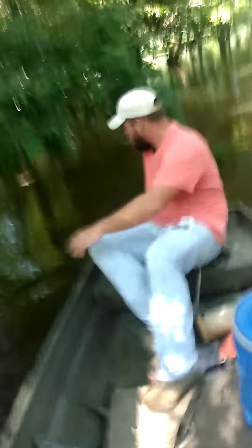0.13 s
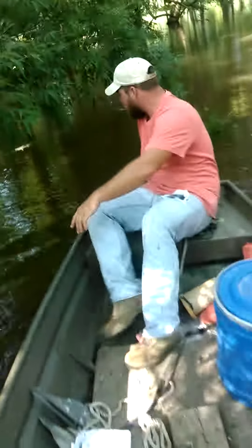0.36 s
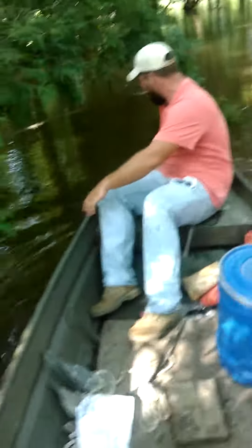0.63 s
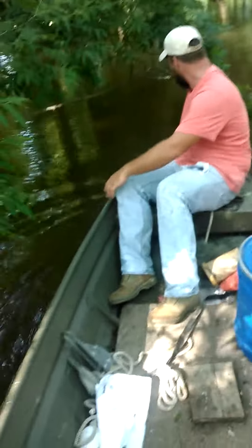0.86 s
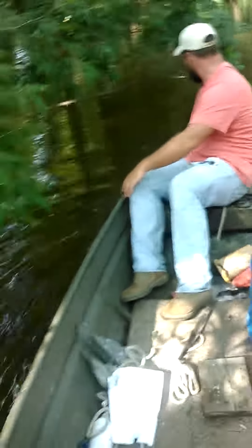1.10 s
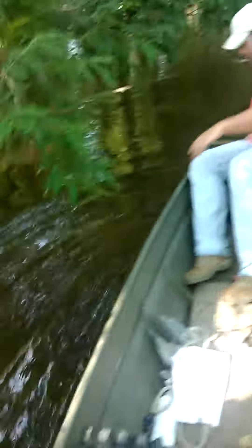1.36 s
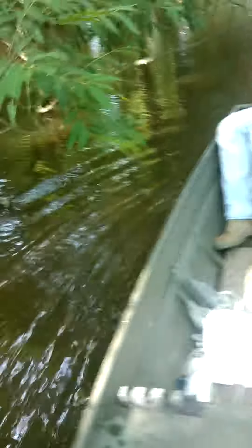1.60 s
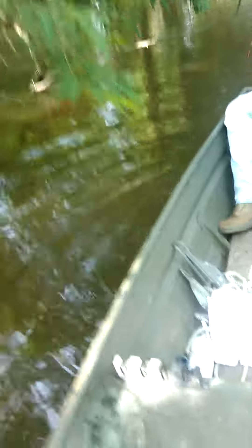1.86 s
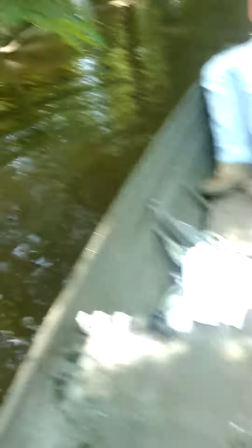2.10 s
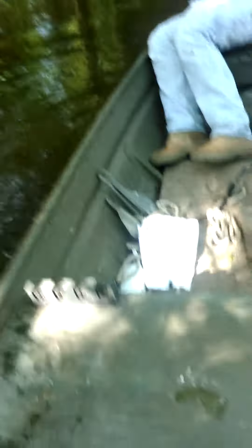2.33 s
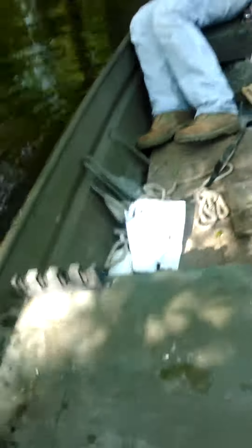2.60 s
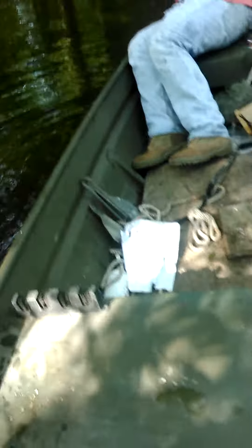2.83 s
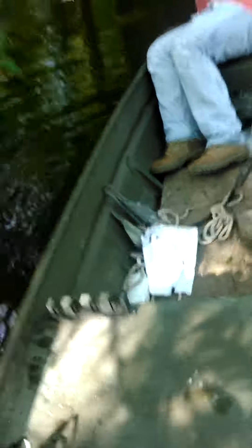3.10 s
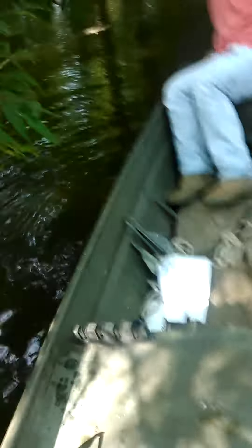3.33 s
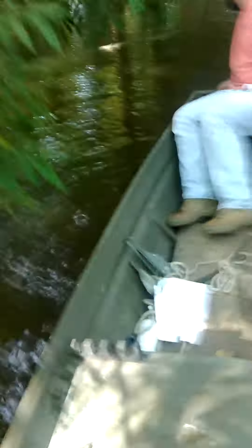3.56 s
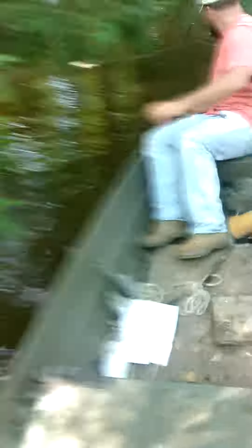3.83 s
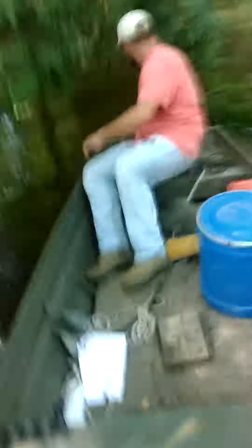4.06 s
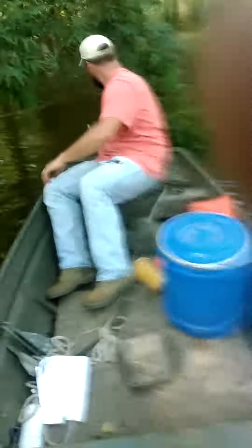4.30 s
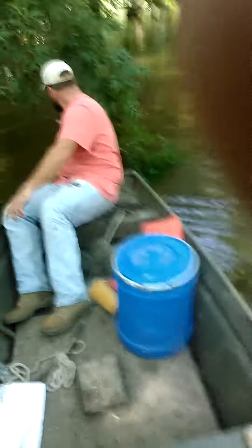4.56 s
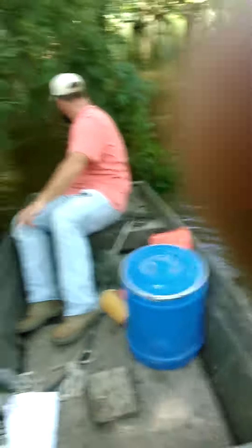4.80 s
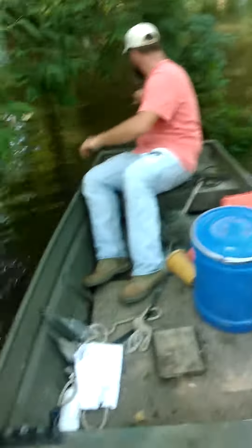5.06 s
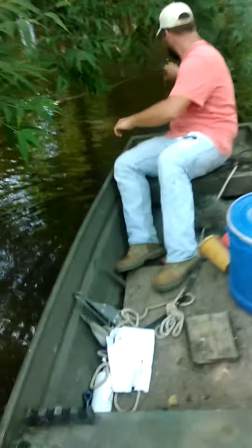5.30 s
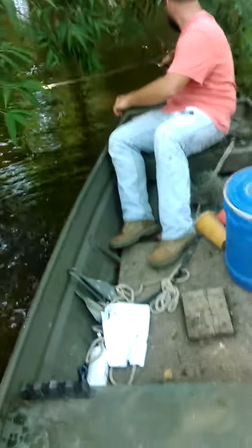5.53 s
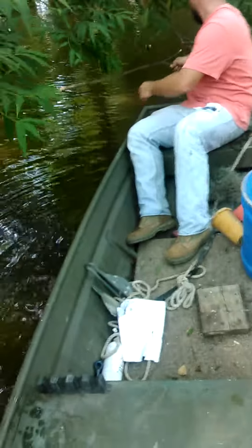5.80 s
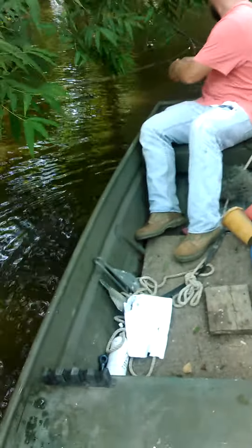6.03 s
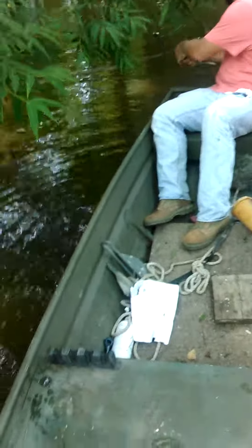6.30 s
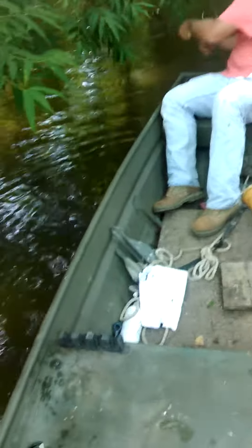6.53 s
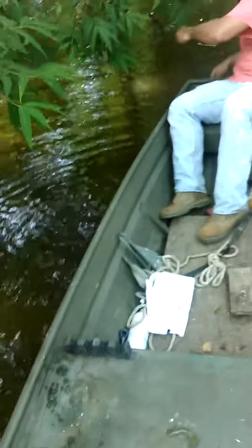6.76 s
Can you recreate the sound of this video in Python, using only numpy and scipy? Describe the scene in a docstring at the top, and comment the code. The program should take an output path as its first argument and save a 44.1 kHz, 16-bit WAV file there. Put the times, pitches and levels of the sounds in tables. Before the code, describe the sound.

Feet and gear shift in a flat metal boat on a wooded river: boomy thud, dragged metal, hard clatter, then quiet insects and birds.

```python
"""Gear and feet shift in a flat metal boat on a wooded river: thuds boom in the hull as damped low tones,
and noise that follows the shifting weight rings the hull's modes. Things tap and drop as short pitched rattles;
dragged metal is gritty noise through resonances, with squeaks; cloth rustles as grainy noise.
An insect chorus hisses from the banks in one high noise band, far birds whistle as gliding tones among
echoing trees, and a faint wash of filtered noise stands for leaves, water and distance."""
import sys
import numpy as np
from scipy import signal
from scipy.fft import rfft, irfft, next_fast_len
from scipy.io import wavfile
from scipy.ndimage import map_coordinates

SR = 44100
rng = np.random.default_rng(int(sys.argv[2]) if len(sys.argv) > 2 else 0)


def volts_from_db(level):
    """Convert decibel levels to linear amplitude ratios."""
    exponent = np.asarray(level, float) / 20
    return 10 ** exponent


def pcm_store(signal):
    """Save signal as 16-bit PCM."""
    levels = np.round(np.clip(np.atleast_2d(signal), -1, 1) * 32767)
    wavfile.write(sys.argv[1], SR, levels.astype(np.int16).T)


N = 304288  # samples


# low modes of the hull [f/Hz, width/Hz, level/dB]
HULL_MODES = [(65.8, 23, 4), (97, 23, 6.5), (138.2, 18.1, 4.5), (194, 40, -1), (248, 59.4, -5),
              (331.3, 29, -9), (465, 110, -22)]
# modes of the ribs, which the taps excite too [f/Hz, width/Hz, level/dB]
RIB_MODES = [(402, 98, 2), (488, 63, 3.5), (531, 91, -0.5), (641.5, 42, 3.5), (702, 170, -5),
             (940, 96, 0.5), (1044, 1050, -7)]
# the boat rocking between shifts [t/s, drone level/dB]
ROCKING = [(0, -47.5), (.9, -52.5), (1.3, -53), (1.6, -46), (2.0, -49), (2.3, -40), (2.65, -36),
           (3.3, -45.5), (3.8, -50.5), (4.5, -57), (4.8, -50.5), (5.2, -56), (6.0, -56), (6.9, -54)]
# soft blows on the hull [t/s, level/dB, f/Hz, t60/s]
THUDS = [(0.105, -2.5, 120, 0.11), (0.139, -23, 126, 0.085), (0.184, -9.5, 122.9, 0.21),
         (0.274, -13, 110, 0.095), (0.353, -22, 121, 0.084), (0.43, -28.5, 118, 0.41),
         (0.579, -36, 96.5, 0.18), (0.79, -27.5, 70.6, 0.3), (0.861, -18.5, 53, 0.17),
         (0.92, -20, 57, 0.11), (1.302, -35, 81, 0.31), (1.85, -28, 63, 0.13), (2.04, -31, 149, 0.54),
         (2.713, -6.5, 192, 0.074), (2.755, -7, 194, 0.16), (2.918, -7.5, 337, 0.098),
         (3.545, -34, 150, 0.13), (4.085, -16.5, 61, 0.14), (4.222, -24, 92.2, 0.095),
         (4.262, -23.5, 74.5, 0.15), (4.395, -20, 80, 0.13), (4.535, -36, 131, 0.15),
         (6.786, -37, 246, 0.11)]


def hull():
    """Modal resonance: shifting weight drones the plates and clatters the ribs; soft blows add damped low swings."""
    rocking_db = curves(ROCKING)[0] + 2 * wobble(11)  # a slight random sway
    clatter_beside_drone_db = -12
    rocking_clatter_db = rocking_db + clatter_beside_drone_db
    # powers of shifting and rocking add
    drone_db = 10 * np.log10(shifts(column=2) + volts_from_db(2 * rocking_db))
    clatter_db = 10 * np.log10(shifts(column=3) + volts_from_db(2 * rocking_clatter_db))

    def soft(hz):
        """Contact compliance: padded contacts give little treble."""
        return 1 / (1 + 1j * hz / 1500) ** 2

    def plates(hz):
        """Modal response of the hull, weakened in the deepest bass."""
        bass_cut = (1j * hz / (1j * hz + 70)) ** 2
        return resonances(HULL_MODES)(hz) * soft(hz) * bass_cut

    drone = rung(drone_db, grains(27, lumpy_db=0.9), plates)
    clatter = rung(clatter_db, grains(80, lumpy_db=2), lambda hz: resonances(RIB_MODES)(hz) * soft(hz))
    out = np.pad(drone + clatter, (0, SR))
    t = np.arange(SR // 2) / SR
    onset = 1 - np.exp(-t / 0.0066)
    for s, db, hz, t60 in THUDS:
        decay = volts_from_db(db + 1 - 60 * t / t60)
        out[round(s * SR):][:len(t)] += decay * np.sin(2 * np.pi * hz * t) * onset
    return out[:N]


# weight shifting on the floor plates [t/s, hold/s, drone level/dB, clatter level/dB, fade t60/s]
SHIFTS = [(0.0, 0.006, -33.5, -48.5, 0.06), (0.106, 0.041, -16.5, -41.5, 0.35),
          (0.259, 0.056, -29, -44, 0.18), (0.343, 0.012, -26.5, -44, 0.22),
          (0.416, 0.014, -28.5, -55, 0.17), (0.485, 0.054, -41, -47.5, .15),
          (0.581, 0.011, -32.5, -63, 0.37), (0.79, 0.028, -38, -58, 0.26),
          (1.047, 0.013, -39.5, -47.5, 0.52), (1.29, 0.038, -43.5, -51, .25),
          (1.664, 0.016, -47, -55.5, 0.69), (1.783, 0.017, -55, -49, 0.08), (2.039, 0.055, -37, -46, 0.19),
          (2.137, 0.049, -35.5, -37, 0.52), (2.438, .07, -40, -42.5, 0.39),
          (2.572, 0.061, -54, -37.5, 0.29), (2.699, 0.042, -13.5, -19.5, 0.29),
          (2.774, 0.045, -15, -30.5, 0.42), (2.855, 0.051, -13, -20, 0.35), (2.97, 0.021, -22, -47, 0.57),
          (3.382, 0.019, -42, -65, 0.18), (3.534, 0.039, -39, -56, 0.36), (4.077, 0.028, -42, -54, 0.12),
          (4.213, 0.015, -33.5, -51, 0.092), (4.266, 0.036, -42, -55, .1),
          (4.324, 0.0087, -30.5, -31.5, 0.14), (4.396, 0.0073, -28, -35.5, 0.03),
          (4.539, 0.012, -42, -70, 0.13), (5.451, .015, -48, -57, 0.25), (6.779, 0.018, -56, -55, 0.19)]


def shifts(column):
    """Exponential decay of power: each weight shift rises quickly, holds, then fades evenly in dB."""
    rise_s = 0.004
    t = np.arange(N) / SR
    power = np.full(N, 1e-12)
    for row in SHIFTS:
        s, hold, t60 = row[0], row[1], row[4]
        level_db = row[column] - 60 * (t - s - hold).clip(0) / t60
        rise = ((t - s) / rise_s + 1).clip(0, 1)
        power += volts_from_db(2 * level_db) * rise ** 2
    return power


# hard contacts [t/s, level/dB, centre f/Hz, t60/s, knock beside the tap/dB]
TAPS = [(0.0373, -24.5, 4900, 0.033, -31), (0.0782, -28.5, 5160, 0.017, -21),
        (0.0955, -33, 5000, 0.015, -11), (0.145, -22, 1500, .015, -15), (0.1611, -30.5, 1450, 0.062, 11),
        (0.2162, -33, 1300, 0.029, -5), (0.259, -33, 2340, 0.039, -9), (0.3545, -32, 4100, 0.044, -22),
        (0.4443, -37, 2200, .026, -14), (0.6252, -38.5, 1600, 0.038, -18), (1.049, -31.5, 2320, .09, -3),
        (1.3073, -34, 1780, 0.026, -12), (1.6863, -33, 7480, 0.024, 10), (1.8016, -29, 2130, 0.01, -10),
        (1.9106, -25, 6440, 0.037, -31), (2.0488, -31.5, 1080, 0.14, 3), (2.078, -30, 3480, 0.044, -10),
        (2.1307, -35, 2500, 0.039, 12), (2.1477, -14.5, 1200, 0.044, -0.5), (2.1737, -21, 1350, 0.019, -16),
        (2.2971, -26, 4900, 0.13, 2), (2.4839, -30.5, 4960, 0.069, 8), (2.5048, -29.5, 5150, .043, -30),
        (2.554, -9.5, 5200, 0.023, -5), (2.5748, -16, 5460, .016, -13), (2.5822, -14, 5310, 0.024, -16),
        (2.622, -18, 5650, 0.037, -18), (2.6944, 6, 4660, 0.047, 1.5), (2.702, -3, 6050, 0.027, -7),
        (2.813, 3.5, 5760, 0.0072, -0.5), (2.8264, -12, 5640, 0.048, 12), (2.8383, 1.5, 4400, 0.047, 7),
        (2.8493, -5.5, 4700, 0.02, 5), (2.8912, -5.5, 1370, 0.06, -22), (2.9092, -8, 3200, 0.07, -19),
        (2.9283, -17, 1080, 0.018, -4), (2.972, -16, 1060, 0.042, -8), (3.4878, -35.5, 5570, 0.043, 10),
        (3.5675, -29.5, 6030, 0.06, -13), (3.644, -30, 3720, 0.042, -31), (4.0846, -8, 7700, 0.015, -40),
        (4.098, -16, 6660, 0.026, -35), (4.123, -21.5, 6540, 0.14, -7), (4.2253, -27, 5500, 0.12, -22),
        (4.2633, -26, 5670, 0.059, -20), (4.303, -29, 1460, .014, -19), (4.316, -26, 3080, .016, -14),
        (4.3246, -17, 1360, 0.03, -3.5), (4.362, -30, 1560, 0.026, -16), (4.3786, -15, 5600, 0.019, -26),
        (4.3964, -15.5, 5800, 0.03, -14), (4.4193, -18, 3960, .04, -32), (4.684, -31.5, 3320, 0.061, -11),
        (4.8096, -24.5, 5240, 0.028, -3), (4.8647, -16, 6580, 0.005, -44),
        (6.7343, -37.5, 3990, 0.052, -17.5), (6.782, -33, 4000, 0.052, -19)]
# decay of the hull's dense ring [f/Hz, t60/s]
PLATE_DECAY = [(300, 0.17), (1500, 0.27), (5000, 0.17), (12000, 0.061)]


def taps():
    """Impact excitation: a click and dying rattle ring a pitch and knock the ribs, then the plate rings on."""
    first_contact = 9  # size of the first touch over the rattle that follows
    sizzle_floor_db, hard_db, sizzle_growth = -43, -5, 1.8  # growth in dB per dB above hard_db
    out = np.zeros(N + SR)
    t = np.arange(SR // 8) / SR
    broad = resonances([(2780, 1400, -21)])
    high = resonances([(11550, 9600, 0)])

    def dull(f):
        """Low-pass loss: the air and the microphone's port soften the top."""
        return 1 / (1 + 1j * 1.21 * f / 8500 - (f / 8500) ** 2) ** 3

    for s, db, hz, t60, knock_db in TAPS:
        sizzle_db = sizzle_floor_db + sizzle_growth * max(db - hard_db, 0)
        shake = rng.standard_normal((2, len(t))) * volts_from_db(-60 * t / t60)
        shake[:, 0] = first_contact
        pitched = resonances([(hz, 0.41 * hz, 0)])

        def contact(f):
            """Summed resonances: the contact's own pitch, a broad body and a high sizzle."""
            body = np.sqrt(SR / hz) * pitched(f) + hz / 1800 * broad(f)
            return volts_from_db(-11) * body * dull(f) + volts_from_db(sizzle_db) * high(f) ** 3

        tap = filtered(shake[0], contact)
        knock = volts_from_db(knock_db - 5) * filtered(shake[1], resonances(RIB_MODES))
        out[round(s * SR):][:len(t)] += volts_from_db(db) * (tap + knock)
    return out[:N] + volts_from_db(-10.5) * echoes(out[:N], PLATE_DECAY)


# metal gear dragged along the hull [t/s, duration/s, level/dB, swell over the stroke/dB]
DRAG = [(2.043, 0.074, -42, -6.5), (2.126, 0.068, -37, -2.5), (2.217, 0.013, -39, 6),
        (2.252, .13, -36, 2.5), (2.387, 0.21, -36, 7), (2.608, 0.12, -37.5, -16.5)]
# resonances of the rubbed metal [f/Hz, width/Hz, level/dB]
RUBBED_MODES = [(1350, 69, -10), (2060, 65, -1.5), (3100, 250, -6), (4650, 73, -21), (4900, 120, 4),
                (5310, 150, 7), (6800, 110, 17), (7070, 69, -8)]
# spectrum of the broad scuff [f/Hz, relative level per Hz/dB]
GRIT = [(470, -36), (800, -8), (989, -28), (1350, -4), (1510, -13), (2280, -9.5), (2590, -11.5), (4370, -6),
        (5470, -3), (15800, -43.5)]
# squeaks of the rubbed metal [t/s, duration/s, f/Hz, level/dB]
SQUEAKS = [ (2.175, .05, 750, -40), (2.18, .04, 3800, -46), (2.26, .1, 3900, -43), (2.27, .08, 4950, -40),
           (2.272, .1, 2250, -43), (2.35, .07, 1350, -45), (2.355, .04, 6600, -41), (2.4, .05, 3800, -46),
           (2.44, .08, 2250, -47), (2.45, .03, 2800, -42), (2.48, .04, 5300, -42), (2.55, .02, 1350, -38)]


def dragging():
    """Frictional excitation: gritty slips ring fluctuating resonances over a broad scuff, with narrow squeaks."""
    slips = grains(250, lumpy_db=3.5)
    # each resonance comes and goes by itself
    ring = unit(sum(volts_from_db(4 * wobble(25)) * filtered(slips, resonances([mode])) for mode in RUBBED_MODES))
    scuff = unit(filtered(slips, lambda hz: volts_from_db(along(GRIT, hz))))
    out = sum(stroke(*pull) for pull in DRAG) * unit(0.077 * ring + scuff)
    # loose gear rattles on after the drop
    out += stroke(2.695, length=0.307, db=-30.5, swell_db=-6.5) * scuff
    for s, length, hz, db in SQUEAKS:
        catch = rng.standard_normal(SR // 4)[:round(length * SR)]
        narrow = resonances([(hz, 110, 0)])
        squeak = unit(filtered(catch, lambda f: narrow(f) ** 2)) * np.hanning(len(catch)) ** .5
        out[round(s * SR):][:len(catch)] += volts_from_db(db) * squeak
    return out


# cloth and hands brushing near the microphone
# [t/s, duration/s, level/dB, swell over the stroke/dB, bright edge beside the body/dB]
RUSTLE = [(0.0, 0.062, -49.5, -6, -26), (0.092, 0.092, -45.5, -2, -33), (0.193, 0.16, -45, -12, -21),
          (0.35, 0.28, -49.5, -11, -23), (1.46, .27, -59.5, 0.5, -28), (1.741, .2, -53, 3.5, -12.5),
          (1.948, 0.16, -53, 1, -14), (3.008, 0.26, -42.5, -14, -15.5), (3.301, 0.54, -57, 4, -13),
          (3.931, 0.17, -54.5, 10, -9.5), (4.105, 0.075, -59, 2, -12), (4.191, 0.12, -54, 11, -14.5),
          (4.392, 0.044, -25, -3, -17.5), (4.458, 0.16, -54, -2, -11), (4.614, 0.2, -52.5, 9, -22),
          (4.791, 0.057, -51.5, 7, -4.5)]
# spectrum of the cloth's body [f/Hz, relative level per Hz/dB]
CLOTH = [(470, -48), (800, -19.5), (2110, -5), (2310, -4.5), (3060, -1.5), (3510, -3.5), (7000, -2),
         (9100, -43), (15400, -120)]


def rustle():
    """Granular friction noise: fine fibres slip in a soft, grainy swish with a brighter edge."""
    fibres = grains(300, lumpy_db=3)
    body = unit(filtered(fibres, lambda hz: volts_from_db(along(CLOTH, hz))))
    edge = unit(filtered(fibres, lambda hz: resonances([(9500, 6000, 0)])(hz) ** 3))
    return sum(stroke(*swish) * (body + volts_from_db(bright_db) * edge) for *swish, bright_db in RUSTLE)


# loudness of the insects [t/s, level/dB]
CHORUS = [(0.0, -46), (0.38, -45.5), (1.69, -46.5), (2.63, -48), (2.71, -44.5), (3.06, -47.5),
          (3.92, -47.5), (4.36, -50.5), (4.71, -49), (4.98, -50.5), (5.86, -50), (6.9, -51)]
# spectrum of the rasping wings [f/Hz, relative level per Hz/dB]
WINGS = [(4000, -47), (6800, -21), (7020, -17), (7340, -4), (7610, -1), (7910, 5), (8680, -2),
         (9400, -29.5), (12200, -50), (20700, -120)]


def insects():
    """Band-limited modulated noise: many wings rasp in one high band, in quick uneven pulses."""
    rasp = filtered(grains(260, lumpy_db=1.0), lambda hz: volts_from_db(along(WINGS, hz)))
    return volts_from_db(curves(CHORUS)[0] + .6 * wobble(10)) * unit(rasp)


# one bird's phrase [t from its start/s, duration/s, first f/Hz, last f/Hz, relative level/dB]
PHRASE = [(0, 0.0204, 4900, 3850, 2.5), (0.013, 0.044, 3910, 3720, 2), (0.088, .075, 3500, 2298, 2.5),
          (0.159, 0.028, 2302, 2186, -2), (0.267, .07, 1980, 1900, -13), (0.358, 0.063, 1787, 1650, -9.5)]
# times that bird sings it [t/s, level/dB, opening notes beside the rest/dB]
SINGS = [(4.079, -50, -3), (4.592, -47, -7.5), (5.139, -51, 0.5)]
# other birds' whistles [t/s, duration/s, first f/Hz, last f/Hz, level/dB]
WHISTLES = [(0.88, 0.12, 2280, 2500, -71), (1.53, 0.052, 6250, 5660, -61), (1.63, 0.11, 4400, 4600, -60),
            (1.84, 0.08, 4220, 4480, -60.5), (5.633, 0.048, 3590, 3390, -51),
            (5.697, 0.024, 6470, 5700, -60), (5.71, .04, 5680, 5600, -62), (5.801, 0.11, 4410, 4600, -60),
            (5.853, 0.033, 3780, 3495, -51), (6.046, 0.033, 4270, 4100, -58), (6.062, .05, 3520, 3750, -51),
            (6.167, 0.089, 4420, 4880, -62), (6.285, 0.038, 3645, 3755, -51),
            (6.326, 0.047, 4280, 4180, -65.5), (6.486, 0.048, 3815, 3660, -52),
            (6.712, 0.044, 3930, 3890, -62)]


def birds():
    """Frequency glides in a reverberant field: whistles heard mostly as echoes off the trees."""
    opening_s = .05  # notes starting earlier in the phrase are opening notes
    notes = []
    for s, db, opening_db in SINGS:
        for at, length, first_hz, last_hz, note_db in PHRASE:
            level_db = db + note_db + opening_db * (at < opening_s)
            notes.append((s + at, length, first_hz, last_hz, level_db))
    out = np.zeros(N + SR)
    for s, length, first_hz, last_hz, db in notes + WHISTLES:
        u = np.linspace(0, 1, round(length * SR))
        pitch = first_hz + (last_hz - first_hz) * u
        swell = np.sqrt(np.sin(np.pi * u).clip(0))
        out[round(s * SR):][:len(u)] += volts_from_db(db) * swell * np.sin(2 * np.pi * np.cumsum(pitch) / SR)
    tree_decay = [(1500, 0.33), (3600, 1.29), (6000, 1.3)]  # f/Hz, t60/s
    return out[:N] + volts_from_db(6.0) * echoes(out[:N], tree_decay)


# spectrum of the open air [f/Hz, relative level per Hz/dB]
AIR = [(15, -34.5), (25, 7.5), (73, 11), (135, -29.5), (372, -32), (431, -21), (2320, -19.5), (3630, -19.5),
       (4010, -20), (6100, -19), (6910, -27), (8020, -36), (9300, -31), (12100, -85), (20500, -120)]
# loudness of the open air [t/s, level/dB]
AIR_LEVEL = [(0, -45), (1.5, -47.5), (3, -44.5), (4.5, -47), (5.2, -49), (6.9, -51)]


def air():
    """Spectrally shaped noise: leaves, water and distance in a faint, slightly patchy wash."""
    wash = filtered(grains(34, lumpy_db=0.7), lambda hz: volts_from_db(along(AIR, hz)))
    return volts_from_db(curves(AIR_LEVEL)[0]) * unit(wash)


def stroke(s, length, db, swell_db):
    """Amplitude envelope: the gain of one stroke, soft at its edges, swelling or fading evenly in dB."""
    edge_s = .007
    t = np.arange(N) / SR - s
    edges = (np.minimum(t, length - t) / edge_s + .5).clip(0, 1)
    return volts_from_db(db + swell_db * (t / length).clip(0, 1)) * edges


def rung(level_db, shaking, response):
    """Source and filter: shaking that follows a level curve, heard through a body that rings on after it."""
    steady = filtered(shaking, response)
    return filtered(volts_from_db(level_db) * shaking, response) / np.std(steady)


def resonances(modes):
    """Modal superposition: the causal response of (f/Hz, width/Hz, level/dB) modes of alternating sign."""
    def response(f):
        total = 0
        for k, (centre, width, db) in enumerate(modes):
            damping = 1j * f * width
            total = total + (-1) ** k * volts_from_db(db) * damping / (centre * centre - f * f + damping)
        return total
    return response


def echoes(x, t60s):
    """Diffuse reverberation: in the tail each frequency dies at its own speed."""
    hz, t, z = signal.stft(rng.standard_normal(SR), SR, nperseg=256)
    decay = volts_from_db(-60 * t / along(t60s, hz)[:, None])
    tail = signal.istft(z * decay, SR, nperseg=256)[1]
    return signal.fftconvolve(x, tail / np.linalg.norm(tail))[:N]


def grains(rate, lumpy_db):
    """Amplitude modulation: unit-rms noise whose size varies smoothly, rate random knots a second."""
    return unit(volts_from_db(lumpy_db * wobble(rate)) * rng.standard_normal(N))


def wobble(rate):
    """Band-limited random fluctuation: a smooth curve with rate knots a second, 400 at most."""
    knots = rng.standard_normal(int(N * 400 / SR) + 4)
    return map_coordinates(knots, [np.arange(N) * min(rate, 400) / SR])


def filtered(x, response):
    """Linear filtering: the spectrum of x times a complex response of frequency."""
    m = next_fast_len(len(x) + 8192)
    return irfft(rfft(x, m) * response(np.fft.rfftfreq(m, 1 / SR)), m)[:len(x)]


def along(points, hz):
    """Logarithmic frequency scale: (f/Hz, value) points joined on a log axis."""
    f, v = np.transpose(points)
    return np.interp(np.log(hz + 1), np.log(f + 1), v)


def curves(rows):
    """Linear interpolation in time: one curve per column after t/s; -120 dB where the rows do not reach."""
    s, *cols = np.transpose(rows)
    t = np.arange(N) / SR
    stops_early = s[-1] < N / SR - .1
    return [np.interp(t, s, c, left=-120, right=-120 if stops_early else c[-1]) for c in cols]


def unit(x):
    """Root-mean-square normalisation: x scaled to rms 1."""
    return x / np.sqrt(np.mean(x ** 2) + 1e-20)


def scene():
    """Linear superposition: all sources add at one microphone."""
    return (hull() + taps() + dragging() + rustle() + insects() + birds() + air())[None]


def band_limit(x):
    """A steep low-pass at the top of the band."""
    return signal.sosfilt(signal.butter(12, 16660, fs=SR, output="sos"), x)


# spectrum of the recorder's own noise [f/Hz, relative level per Hz/dB]
HISS = [(5470, -17), (9300, -4), (11000, -3), (14900, -6.5), (15000, -9), (15700, -1.5)]


def record(dry):
    """Band limiting and clipping: the deepest bass drops, the loudest clicks clip, and a faint hiss is added."""
    x = filtered(dry[0], lambda hz: (1j * hz / (55 + 1j * hz)) ** 2)
    x = filtered(np.clip(x, -1, 1), lambda hz: hz < 16600)
    hiss = filtered(rng.standard_normal(N), lambda hz: volts_from_db(along(HISS, hz)) * (hz < 15850))
    mix = (x + volts_from_db(-70.0) * unit(hiss))[None]
    return band_limit(mix)


dry = scene()
out = record(dry)
pcm_store(out)
```